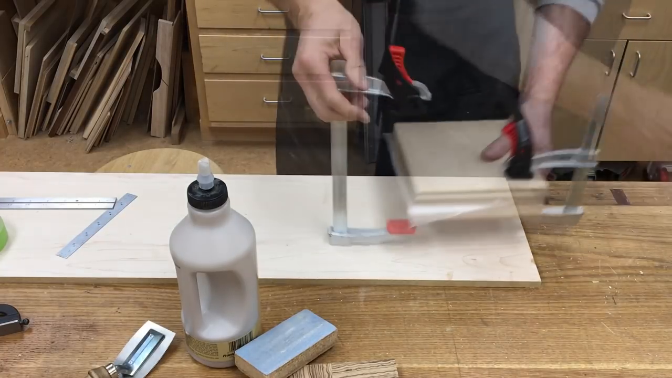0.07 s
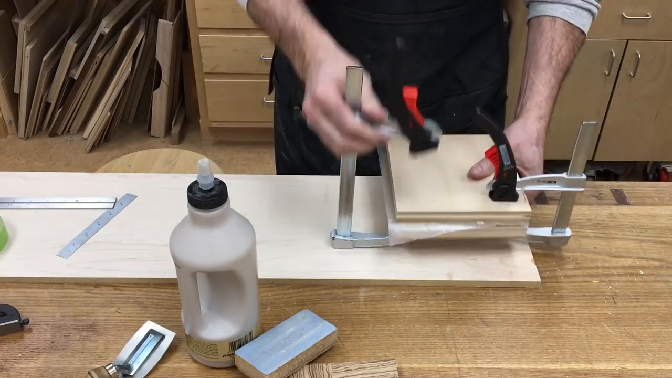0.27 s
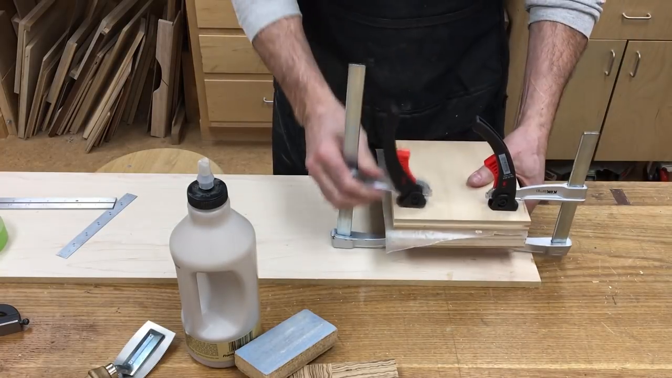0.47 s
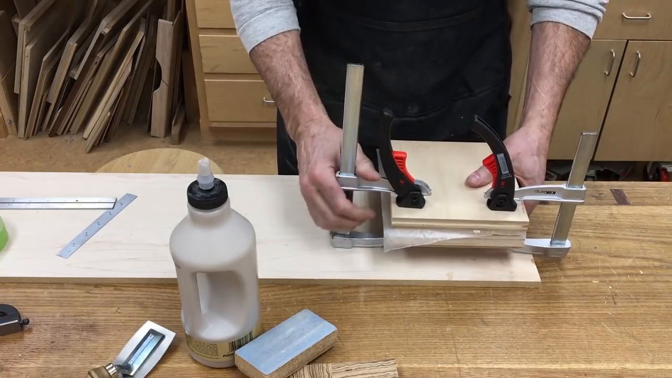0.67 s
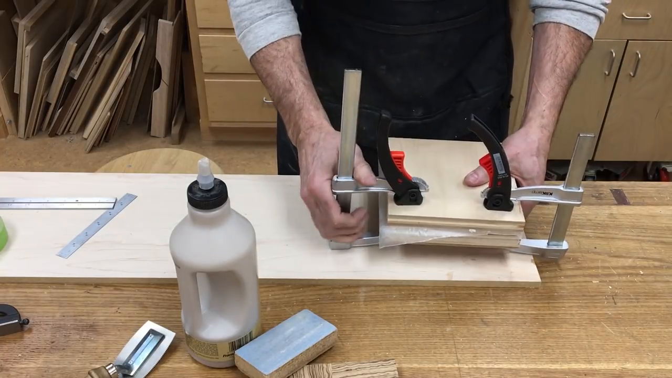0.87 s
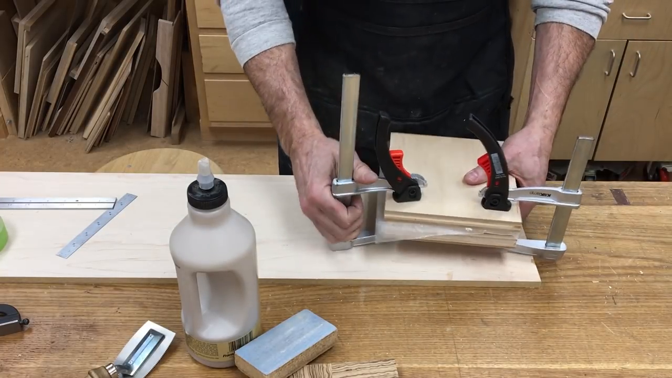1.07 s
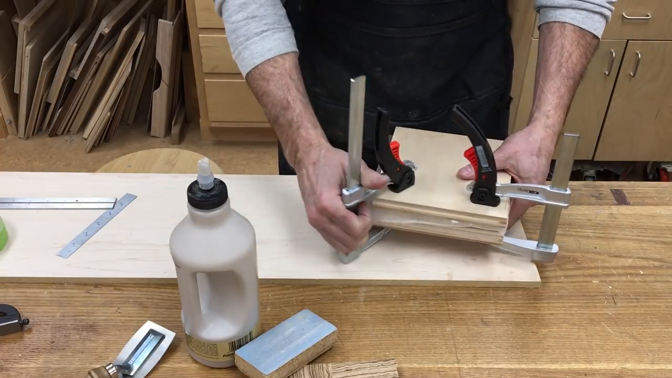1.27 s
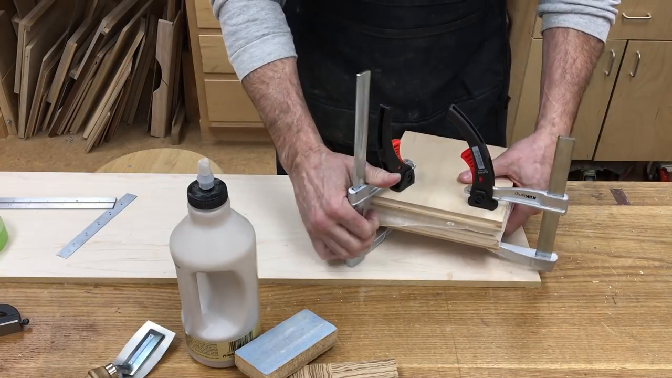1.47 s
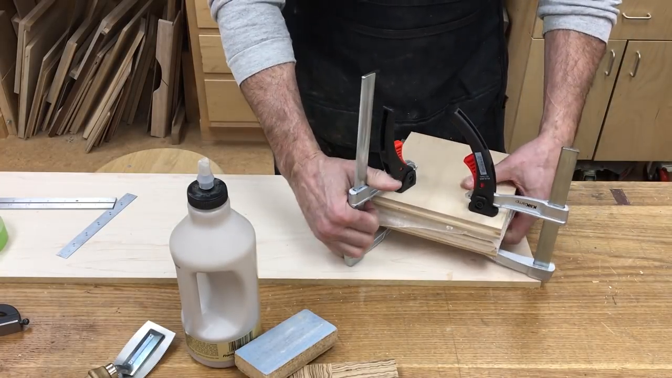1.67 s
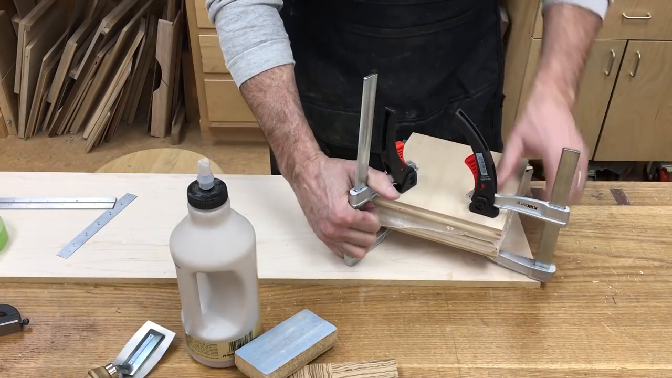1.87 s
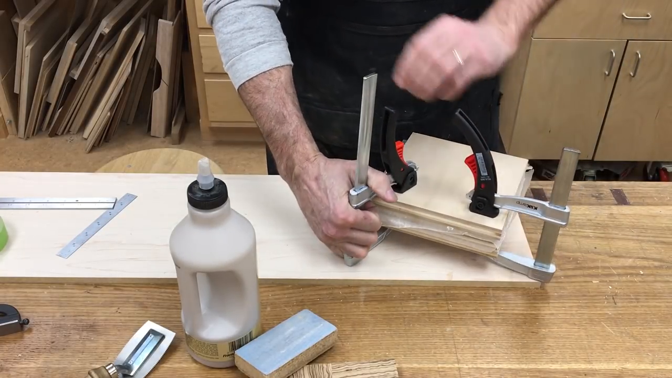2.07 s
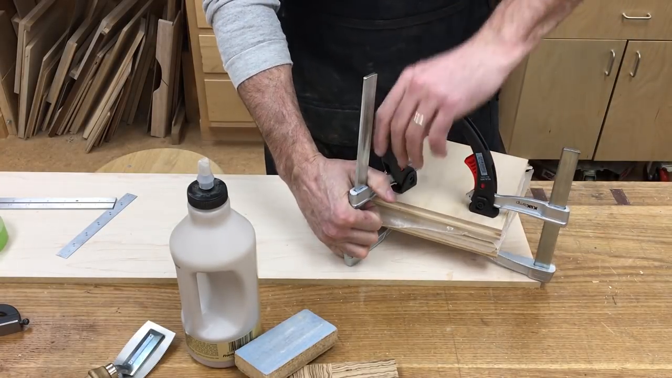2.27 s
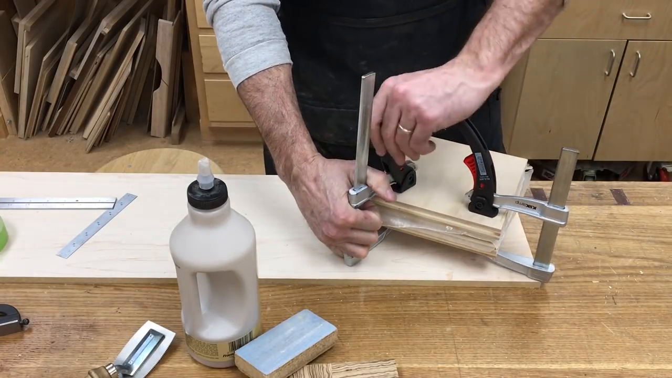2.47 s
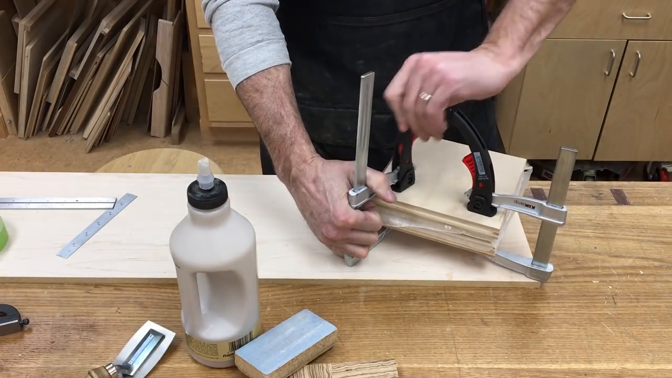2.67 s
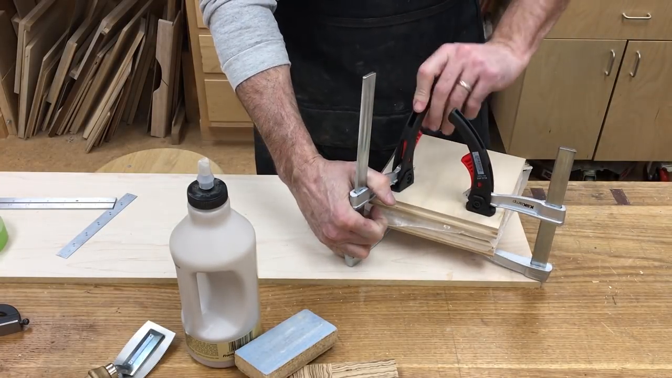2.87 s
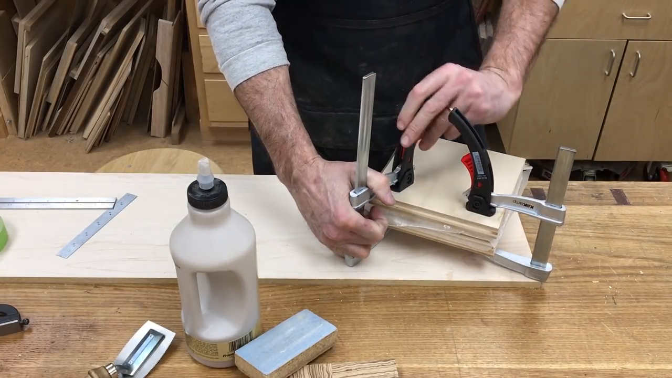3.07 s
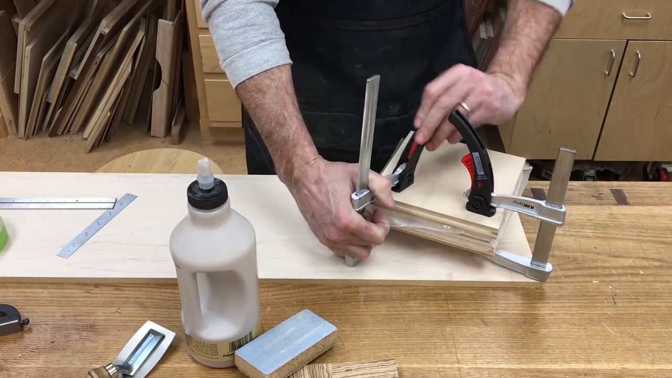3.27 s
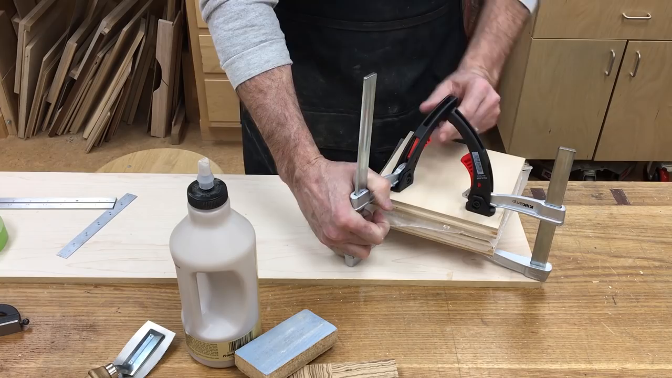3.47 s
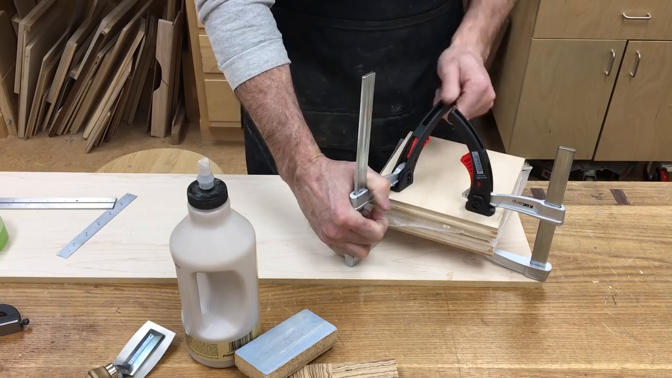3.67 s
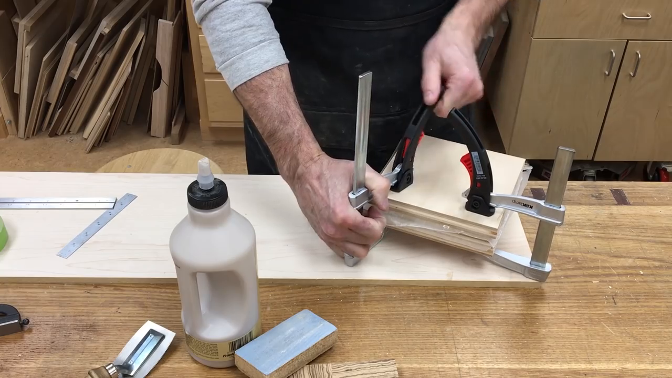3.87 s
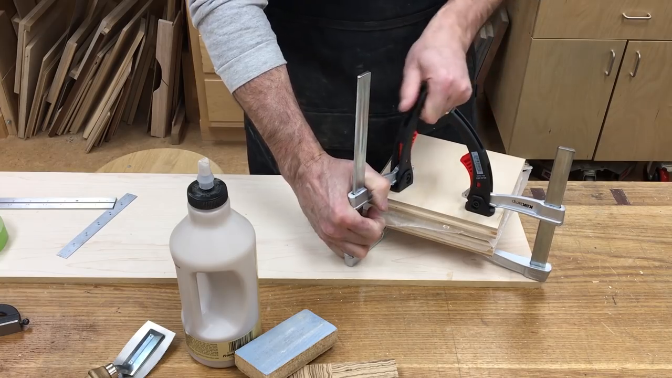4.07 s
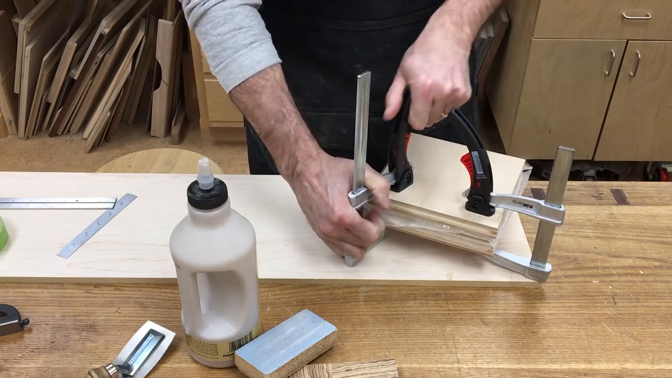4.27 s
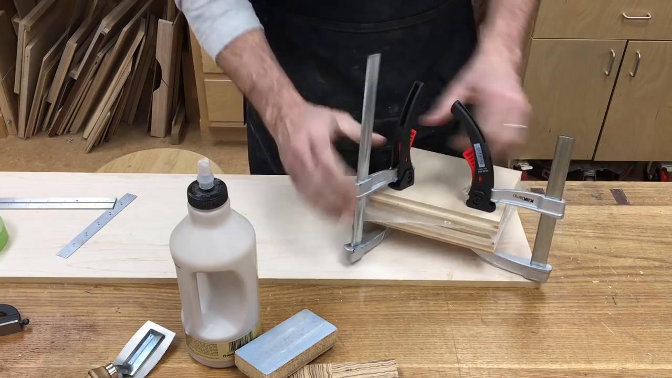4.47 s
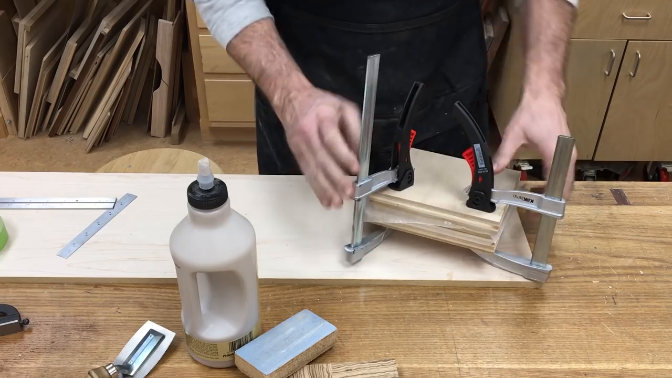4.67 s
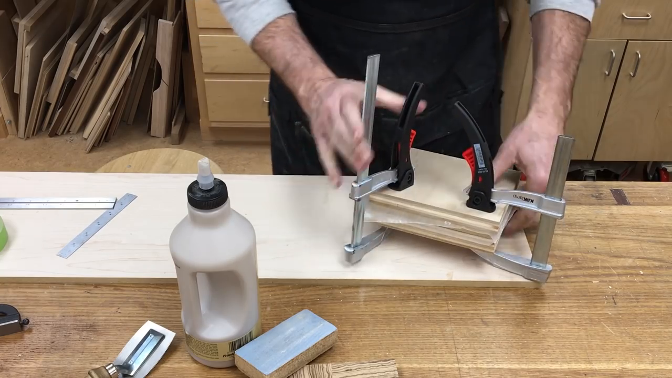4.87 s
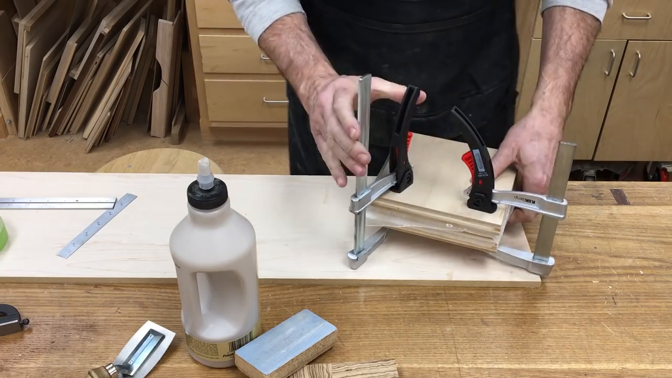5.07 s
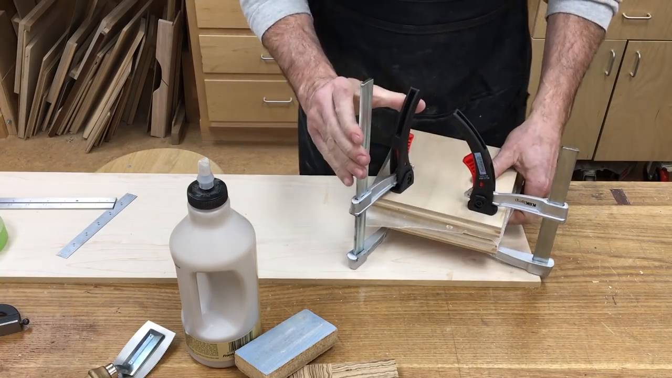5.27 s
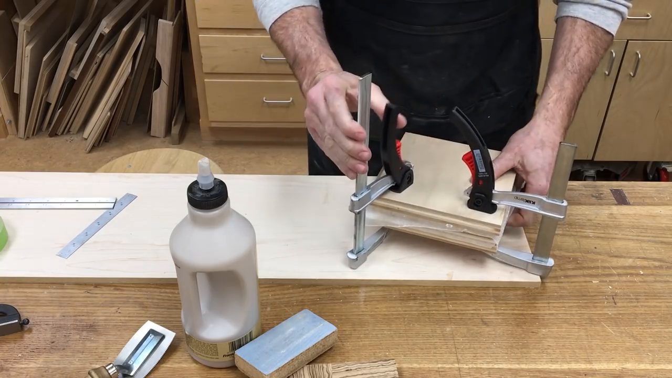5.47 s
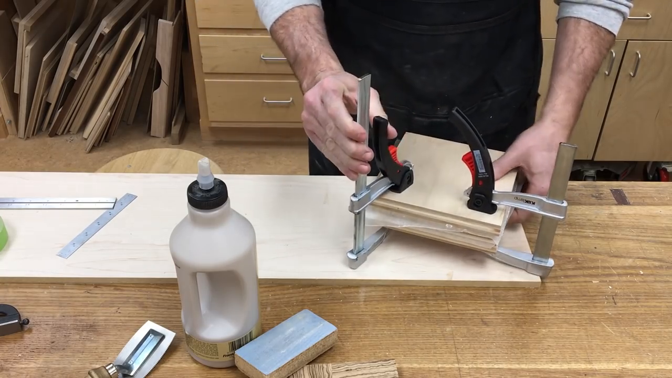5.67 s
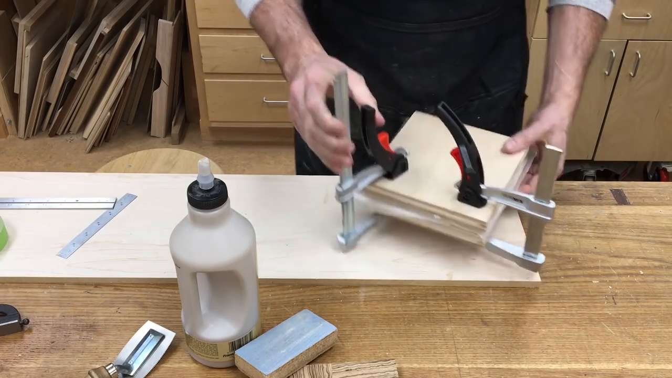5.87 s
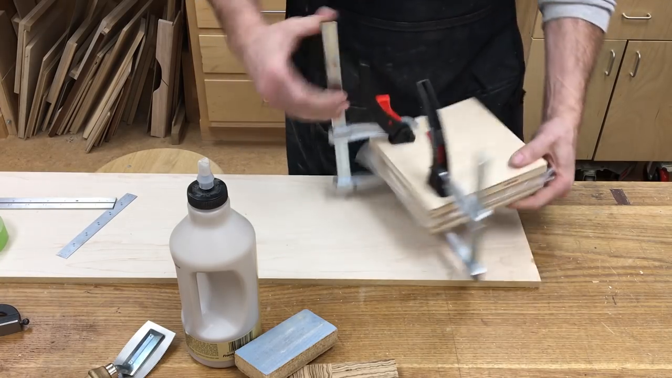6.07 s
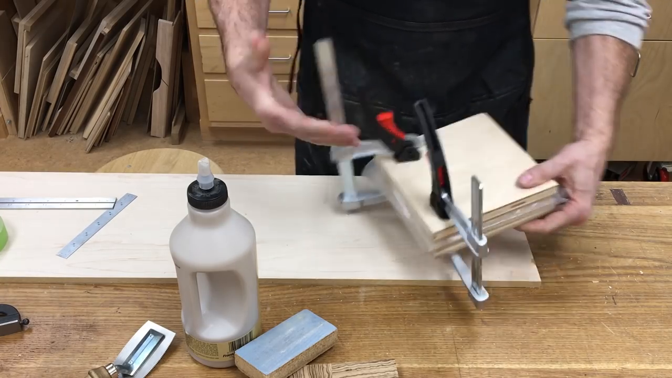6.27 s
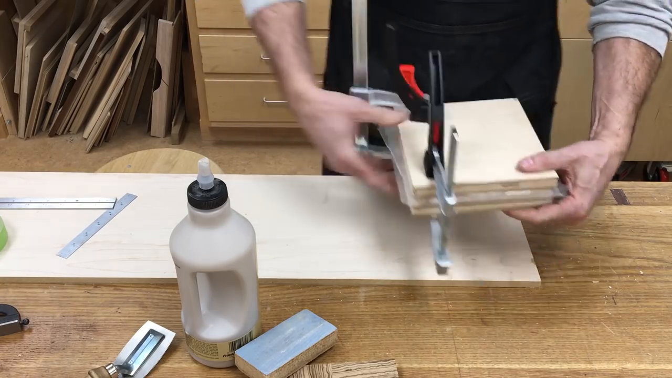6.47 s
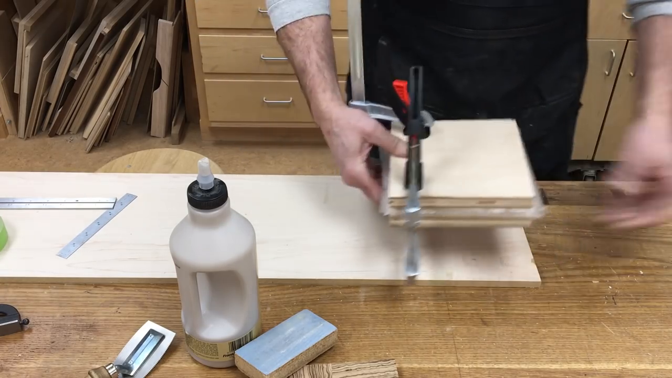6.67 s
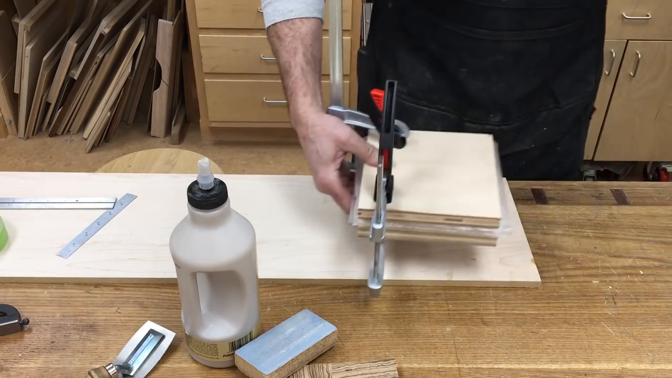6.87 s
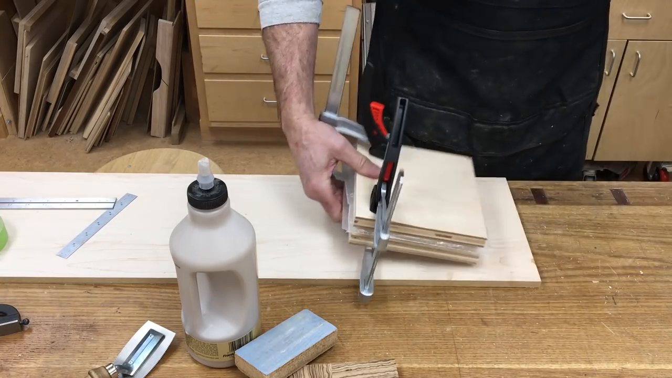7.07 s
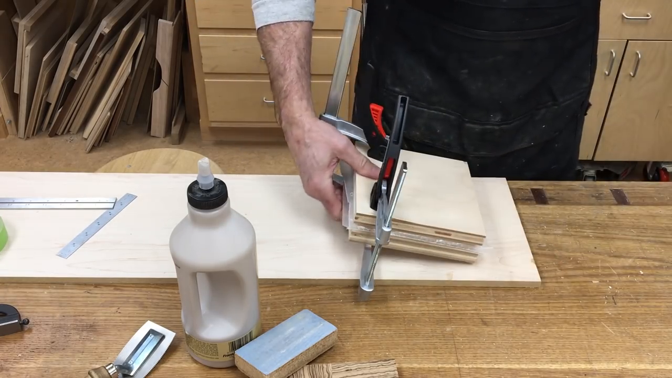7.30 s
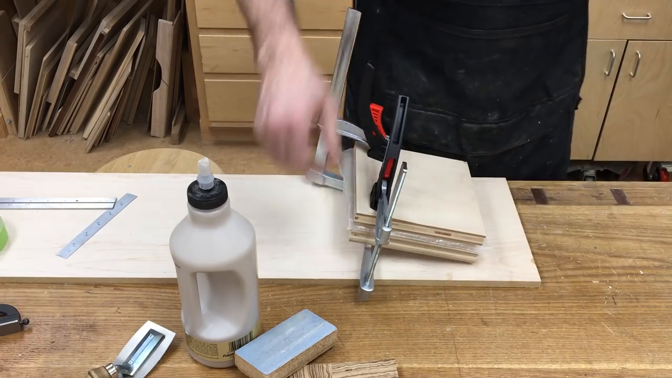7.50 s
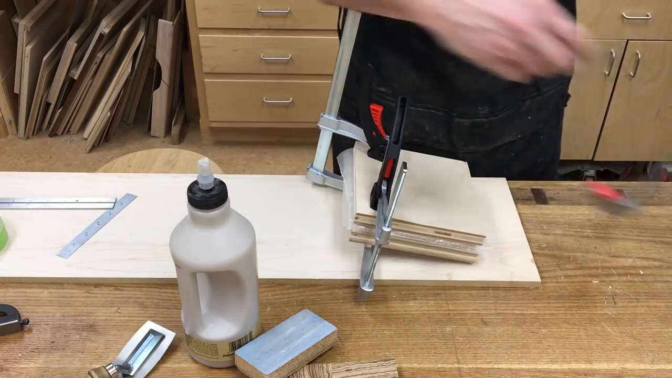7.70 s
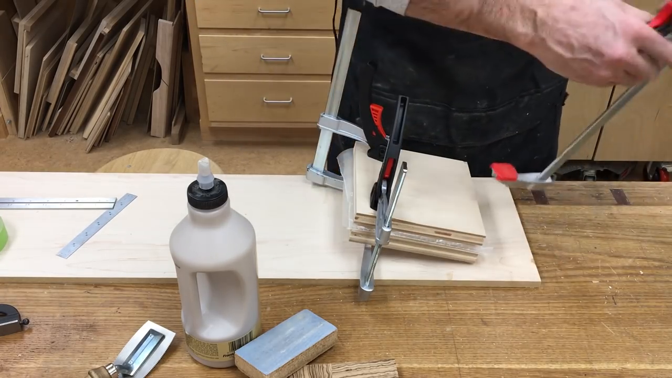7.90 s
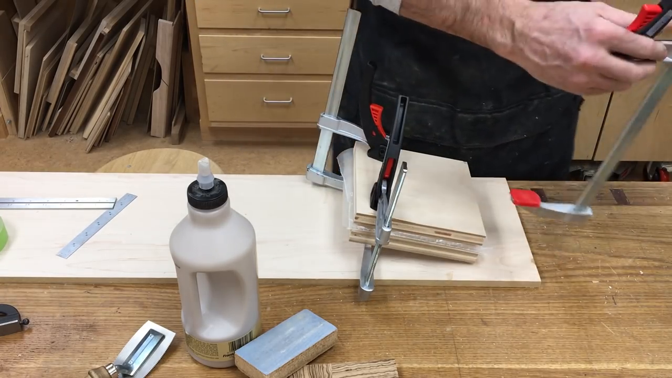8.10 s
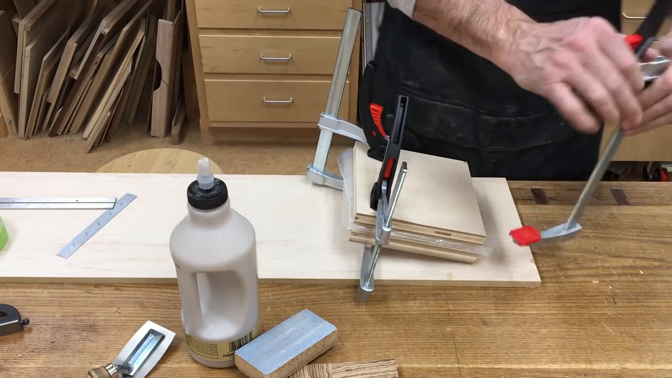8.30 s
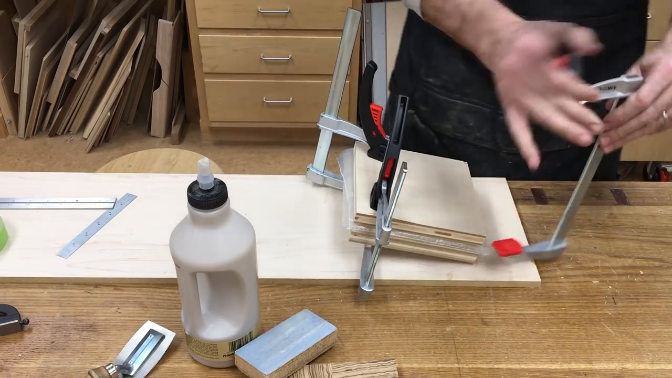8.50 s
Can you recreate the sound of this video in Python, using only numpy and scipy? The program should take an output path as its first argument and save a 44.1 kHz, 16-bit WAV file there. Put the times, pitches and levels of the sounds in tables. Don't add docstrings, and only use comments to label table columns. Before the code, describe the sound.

Metal bar clamps bite, crack and ratchet loudly on a plywood stack, which thuds onto a bench in a quietly rumbling workshop.

```python
import sys
import numpy as np
from scipy import signal
from scipy.fft import rfft, irfft
from scipy.io import wavfile
from scipy.ndimage import uniform_filter1d

SR = 44100
rng = np.random.default_rng(int(sys.argv[2]) if len(sys.argv) > 2 else 0)


def store_pcm(level_fs):
    pcm = np.round(np.clip(level_fs, -1, 1) * 32767).astype(np.int16)
    wavfile.write(sys.argv[1], SR, np.atleast_2d(pcm).T)


def natural_amplitude(level_db):
    exponent = np.asarray(level_db, float) / 20
    return 10 ** exponent


N = 376613
SPAN = 8192
HZ = np.fft.rfftfreq(SPAN, 1 / SR)
T = np.arange(SPAN) / SR
TOP_HZ = 15750

# freq_hz, density_db
AIR = [(15, -55.5), (25, -24.5), (36, -7), (61, 3), (156, -5.5), (178, -4), (297, -12.5), (631, -22),
       (1200, -22.5), (2010, -28), (2170, -27.5), (2360, -33.5), (3930, -48.5), (4260, -53.5), (15500, -68)]
# start_s, effort_db
RUBBING = [(0, -64), (.35, -59), (.8, -58), (1.1, -59), (1.14, -69), (1.45, -57.5), (1.621, -62.5),
           (2.02, -67), (2.3, -67.5), (2.6, -63), (4.45, -65), (4.64, -53.5), (4.85, -66), (5.902, -63),
           (6.299, -50), (6.56, -69.5), (7.471, -60), (8.54, -63.5)]
# freq_hz, density_db
SKIN_DULL = [(1200, -9), (3000, 0), (4500, -2.5), (7000, -7), (10000, -17)]
# freq_hz, density_db
SKIN_BRIGHT = [(5000, -22), (8000, -2), (10500, -6), (13000, -2), (15500, -8)]
# start_s, length_s, level_db, centre_hz
SLIPS = [(0, 0.036, -54.5, 5000), (.2, 0.056, -62, 4000), (1.29, .052, -70.5, 5040),
         (1.39, 0.068, -68, 4010), (1.526, .028, -64, 8000), (1.779, .033, -64.5, 9100),
         (1.92, 0.1, -64.5, 6940), (3.025, .04, -66.5, 5100), (3.219, 0.027, -67.5, 9370),
         (3.55, 0.025, -71.5, 9200), (3.8, 0.092, -72, 7950), (5.003, .084, -69, 4910),
         (5.343, 0.048, -60.5, 5700), (5.395, .04, -66.5, 8710), (6.16, 0.075, -59, 6100),
         (6.385, .09, -61.5, 5870), (6.744, 0.071, -57, 6300), (7.35, 0.018, -65, 4640),
         (8.17, 0.06, -62.5, 8860), (8.39, 0.1, -60.5, 8345)]
# start_s, length_s, level_db, centre_hz
SCRAPES = [(.425, .041, -58, 5400), (.48, 0.076, -43.5, 5980), (.56, 0.061, -50, 5510),
           (.635, 0.058, -51, 5400), (1.863, 0.03, -57.5, 9060), (2.5, 0.12, -61.5, 4730),
           (2.945, 0.082, -66, 10100), (3.155, 0.061, -65.5, 4480), (5.141, 0.039, -56.5, 1520),
           (6.0, .057, -54.5, 1280), (7.539, 0.057, -55, 4300), (7.6, 0.058, -60, 3440),
           (7.926, 0.051, -45.5, 3324)]
# start_s, length_s, level_db, centre_hz
SHAKES = [
    (4.70, 0.024, -50.5, 3890),
    (4.735, .028, -52.5, 3885),
    (7.375, 0.044, -49, 4393),
]
# start_s, steel_db, wood_db, contact_s
JAW = [
    (0.0244, -20.5, -29, .0051),
    (0.2245, 4, -3.5, .0071),
    (0.383, -25.5, -27, 0.022),
    (.413, -15.5, -23.5, 0.01),
    (0.4589, -3, -19.5, .014),
    (0.521, -21.5, -25, 0.028),
    (0.5362, 2, -13.5, .01),
    (0.565, -23.5, -36.5, 0.011),
    (0.6136, -1, -14, .0094),
]
# start_s, peak_db, centre_hz
TICKS = [(.1155, -39, 3577), (.1929, -32.5, 5600), (.3597, -26, 4500), (.451, -25, 4730),
         (1.4498, -32.5, 3830), (1.4611, -26, 4050), (1.485, -28, 3680), (1.5125, -34, 5860),
         (1.593, -28.5, 6460), (1.8303, -27.5, 6700), (2.0717, -43, 2660), (2.378, -42.5, 5040),
         (2.9507, -30.5, 3300), (3.5303, -34.5, 3270), (4.285, -35, 4250), (4.5361, -33, 3400),
         (5.567, -42, 7000), (5.9678, -32, 3410), (6.2645, -24, 6000), (6.4303, -33, 6000),
         (6.4603, -42, 6220), (6.5135, -28, 5810), (7.573, -21.5, 3280), (7.6505, -37.5, 3580),
         (7.7931, -30.5, 2560), (8.104, -33, 5590), (8.3965, -32.5, 2510), (8.5221, -36, 5434)]
# start_s, peak_db, centre_hz
CLINKS = [
    (2.6758, -20, 2982),
    (3.3358, -22, 3995),
    (3.3409, -19.5, 3500),
    (7.2795, -27, 2288),
    (8.1354, -10.5, 2574),
    (8.1622, -13, 2892),
]
# start_s, peak_db, thump_hz, hardness_db (knock over thump)
THUDS = [(0.223, -10, 346, 13), (0.716, -19.5, 157, 15), (1.517, -20, 180, -3.5), (1.809, -26, 154, 6),
         (2.958, -25, 147, -3), (3.527, -27.5, 163, -6.5), (3.595, -16, 287, -4), (4.543, -19, 176, -8.5),
         (4.662, -15, 190, -11.5), (4.672, -3, 100.4, -0.5), (4.6933, -5.5, 94, 1), (4.709, -11, 146, 2),
         (4.728, -9, 139.4, -10), (5.29, -24.5, 155.4, -9.5), (5.359, -24.5, 290, 1.5),
         (5.971, -21.5, 180, -14.5), (6.379, -2.5, 167, -3), (7.279, -2.5, 187, -10.5),
         (7.319, -12, 155, -25), (7.346, -11, 235, 5.6), (7.357, -1, 123, -8.5), (7.372, -8, 290, -0.1),
         (7.387, -15, 119.5, -5)]
# start_s, peak_db, brightness_db_per_octave, ride_ahead_s, ride_db (under the snap)
RATCHET = [
    (4.097, 4.5, 3.5, 0.013, -22),
    (4.1599, 2.5, 3, .0083, -15),
    (4.3007, 3.5, 3, 0.0083, -19.5),
    (4.352, 6, 3.5, .004, -26),
    (4.3955, 2.5, 1.6, 0.0019, -20.5),
    (5.5902, 8, 0, .0032, -26),
    (5.639, 3.5, 2, .004, -24),
    (5.7308, 3, 1.15, 0.0094, -24.5),
    (5.809, 2, 1.85, .0085, -22),
]
# start_s, peak_db, brightness_db_per_octave, ride_ahead_s, ride_db (under the snap)
CATCH = [
    (.7061, 4, 1.9, .006, -35),
    (0.716, 3, 0.22, 0.0016, -36),
    (3.592, -0.5, .3, 0.0054, -41),
    (3.9949, 6, 0.22, 0.0077, -24.5),
]
# freq_hz, level_db, t60_s
BAR = [(4250, -11, .04), (4730, -10, .04), (5720, -9, .05), (6870, -11, .05), (7160, -7, .08),
       (9090, -6, .1), (9390, -11, .06), (11200, -8, .09), (12500, -14, .05), (13100, -9, .08),
       (14200, -13, .07)]
# freq_hz, level_db, t60_s
FOOT = [(3800, -2, .03), (5100, -7, .03), (6150, -1, .045), (7500, -8, .03)]
# freq_hz, level_db, t60_s
PAWL = [(2240, -11, .01), (3390, -1, .018), (3640, -2, .016), (4600, -8, .012), (5500, -5, .015),
        (6910, -9, .011), (8450, -6, .007), (9400, -7, .006), (11800, -11, .006), (14800, -16, .006)]
# freq_hz, level_db, t60_s
CATCH_STEEL = [(3400, -2, .015), (4540, -9, .012), (5076, -4, 0.0047), (5570, -0.5, 0.034),
               (7000, 5, 0.0049), (9100, -6, 0.021), (12300, -11.5, 0.011), (13400, -16.5, .008)]
# freq_hz, level_db, t60_s
BOARD = [(290, 3.5, 0.32), (357, 8.5, 0.056), (470.4, -3, 0.26), (605.6, 3.5, 0.17), (837, 3.5, 0.13),
         (1033, 8.5, 0.062), (1140, -5, 0.015), (1487, 3.5, 0.093), (2063, 6, 0.025)]
# ratio (of the thump pitch), level_db, t60_cycles (of that pitch)
BENCH = [(1, -3, 19), (1.6, -4, 11), (.62, -10, 36)]
# freq_hz, density_db
CRACK = [(240, -25), (400, -4.5), (1760, -12.5), (3370, -5), (4310, -7.5), (7060, -8.5), (7750, -24.5),
         (8500, -8.5), (16000, -29.5)]
# freq_hz, level_db
LEVER = [(500, -12), (2500, -9), (3500, 0), (4400, -5), (5500, 0), (7000, -5), (10000, -9), (15000, -22)]
# freq_hz, t60_s
SHOP = [(150, 0.5), (1000, 0.32), (4000, 0.28), (12000, 0.079)]


def unit(x):
    return x / np.sqrt(np.mean(x ** 2) + 1e-20)


def along(points, hz):
    f, v = np.transpose(points)
    return np.interp(np.log(hz + 1), np.log(f + 1), v)


def noise(spectrum, patchy_db):
    hz, _, z = signal.stft(rng.standard_normal(N), SR, nperseg=2048)
    field = uniform_filter1d(rng.standard_normal(z.shape), 20, 0)
    field = unit(uniform_filter1d(field, 3, 1))
    gain = natural_amplitude(along(spectrum, hz)[:, None] + patchy_db * field)
    gain = gain * (hz < TOP_HZ)[:, None]
    return unit(signal.istft(z * gain, nperseg=2048)[1][:N])


def causal(db):
    c = irfft(np.log(natural_amplitude(db) + 1e-6), SPAN)
    c[1:SPAN // 2] *= 2
    c[SPAN // 2 + 1:] = 0
    return np.exp(rfft(c))


def modes(table, spread):
    hz, db, t60 = np.repeat(table, 3, axis=0).T[:, :, None]
    hz = hz * (1 + spread * rng.standard_normal(hz.shape))
    sign = np.repeat(rng.choice([-1, 1], hz.shape)[::3], 3, axis=0)
    size = sign * natural_amplitude(db + 2.5 * rng.standard_normal(hz.shape))
    width = np.log(1000) / np.pi / t60
    return (size * 1j * HZ * 60 / (hz ** 2 - HZ ** 2 + 1j * HZ * width)).sum(axis=0)


def dying(t60):
    return rfft(natural_amplitude(-60 * T / t60) * rng.standard_normal(SPAN)) / np.sqrt(t60 * SR / np.log(1e6))


def contact(seconds):
    u = T / seconds * 4
    return rfft(u * np.exp(-u) * rng.standard_normal(SPAN))


def hump(centre_hz, octaves, skirt_db=-60):
    db = -3 * (np.log2((HZ + 30) / centre_hz) / octaves) ** 2
    return np.where(HZ > centre_hz, np.maximum(db, skirt_db), db)


def tilted(db_per_octave):
    return db_per_octave * np.log2((HZ + 500) / 4000)


def peak(spectrum, db):
    x = irfft(spectrum, SPAN)
    return natural_amplitude(db) * x / np.abs(x).max()


def add(track, s, sound):
    track[round(s * SR):][:SPAN] += sound * np.clip((T[-1] - T) / .03, 0, 1)


def knock(db, centre_hz):
    wood = natural_amplitude(-2.5) * modes(BOARD, spread=.05) + natural_amplitude(2.7) * dying(0.13) + natural_amplitude(4.0)
    force = natural_amplitude(11.5) + contact(0.0025)
    return peak(force * wood * causal(hump(centre_hz, octaves=0.62, skirt_db=-49)), db)


def thump(db, thump_hz):
    bench = np.array(BENCH) * [thump_hz, 1, 1 / thump_hz]
    push = rfft(np.sin(np.pi * np.clip(T / .0025, 0, 1)))
    return peak(push * modes(bench, spread=0.021), db)


def ventilation():
    return natural_amplitude(-39) * noise(AIR, patchy_db=.6)


def hands():
    s, effort_db = np.transpose(RUBBING)
    effort = natural_amplitude(np.interp(np.arange(N) / SR, s, effort_db))
    dull = natural_amplitude(2) * noise(SKIN_DULL, patchy_db=2.5)
    bright = natural_amplitude(-4) * noise(SKIN_BRIGHT, patchy_db=2)
    return effort * (dull + bright)


def scrapes(track):
    clamp = BAR[:4] + FOOT[:2] + [(hz, db - 8, t60) for hz, db, t60 in BOARD[-4:]]
    for table, steel, ring_db in ((SCRAPES, clamp, 2), (SLIPS, clamp, -13), (SHAKES, FOOT, 7)):
        for s, seconds, db, centre_hz in table:
            stroke = np.clip(np.minimum(T / .006, (seconds - T) / .008 + 1), 0, 1)
            grain_db = 5.5 * np.repeat(rng.standard_normal(SPAN // 64), 64)
            grains = rng.standard_normal(SPAN) * natural_amplitude(grain_db)
            ring = 1 + natural_amplitude(ring_db) * modes(steel, spread=0.0069)
            body = causal(hump(centre_hz, octaves=0.78, skirt_db=-20)) * ring
            x = irfft(rfft(stroke * grains) * body, SPAN)
            add(track, s, natural_amplitude(db) * unit(x) * np.sqrt(SPAN / (seconds * SR)))
    return track


def jaw(track):
    lag_s = 0.0023
    for s, db, wood_db, seconds in JAW:
        bright_db = 0.46 * (db + 1)
        grit = causal(hump(5000, octaves=0.64) + tilted(bright_db)) * (1 + natural_amplitude(-15.5) * dying(0.018))
        ring_db = -2.5 + 0.45 * db
        steel = grit + natural_amplitude(ring_db) * modes(BAR, spread=0.0028)
        add(track, s, knock(wood_db + 1.5, centre_hz=475) + thump(wood_db, thump_hz=281.8))
        add(track, s + lag_s, peak(contact(seconds) * steel, db))
    return track


def ticks(track):
    for table, knock_db in ((TICKS, -13), (CLINKS, -18)):
        for s, db, centre_hz in table:
            steel = 1 + natural_amplitude(-6.5) * dying(.05) + natural_amplitude(-3.5) * modes(PAWL, spread=0.013)
            click = contact(0.0066) * causal(hump(centre_hz, octaves=0.66, skirt_db=-16.0)) * steel
            add(track, s, peak(click, db) + knock(db + knock_db, centre_hz=1110))
    return track


def thuds(track):
    for s, db, thump_hz, hard_db in THUDS:
        click = contact(0.0058) * causal(hump(2300, octaves=0.68, skirt_db=-33))
        click = peak(click, db + hard_db - 13.5)
        knock_hz = 1020 * 2 ** (.06 * min(hard_db, 3))
        add(track, s, thump(db, thump_hz) + knock(db + hard_db, knock_hz) + click)
    return track


def ratchet(track):
    for steel, table in ((PAWL, RATCHET), (CATCH_STEEL, CATCH)):
        for s, db, bright_db, ahead_s, ride_db in table:
            rattle = natural_amplitude(-17) * causal(along(LEVER, HZ)) * dying(.12)
            bounce = natural_amplitude(-7.5) * np.exp(-2j * np.pi * HZ * .004) / (1 + 1j * HZ / 6000)
            grit = contact(.002) + bounce * contact(.005)
            ring = natural_amplitude(8) * (1 + bounce) * modes(steel, spread=0.0044)
            snap = ring + grit * (natural_amplitude(-2.5) * causal(along(CRACK, HZ)) + rattle)
            snap = peak(snap * causal(tilted(bright_db)), db)
            add(track, s, snap + knock(db - 24, centre_hz=518.4))
            body = causal(hump(3400, octaves=0.6)) * (1 + natural_amplitude(1.5) * modes(PAWL, spread=.03))
            ride = peak(contact(0.0042) * body, db + ride_db)
            add(track, s - ahead_s, ride + knock(db + ride_db - 0.5, centre_hz=833))
    return track


def shop(x):
    wet, step = np.zeros(len(x) + SR), SR // 4
    hz, t, z = signal.stft(rng.standard_normal((len(x) // step + 1, SR // 2)), SR, nperseg=256)
    decay = natural_amplitude(-60 * t / along(SHOP, hz)[:, None])
    tails = signal.istft(z * decay, SR, nperseg=256)[1]
    for k, tail in enumerate(tails):
        answer = signal.fftconvolve(x[k * step:][:step], tail / np.linalg.norm(tail))
        wet[k * step + 300:][:len(answer)] += answer
    return wet[:N]


def scene():
    work = sum(part(np.zeros(N + SPAN)) for part in (scrapes, jaw, ticks, thuds, ratchet))[:N]
    work = signal.sosfilt(signal.butter(3, 75, "high", fs=SR, output="sos"), work)
    return (work + natural_amplitude(-19.5) * shop(work) + hands() + ventilation())[None]


def band_limit(x):
    return signal.sosfilt(signal.butter(12, 16320, fs=SR, output="sos"), x)


def record(dry):
    x = signal.sosfilt(signal.butter(2, 42, "high", fs=SR, output="sos"), dry)
    clipped = x / (1 + np.abs(x) ** 12) ** (1 / 12)
    mix = signal.sosfilt(signal.butter(6, 16200, fs=SR, output="sos"), clipped)
    return band_limit(mix)


dry = scene()
out = record(dry)
store_pcm(out)
```